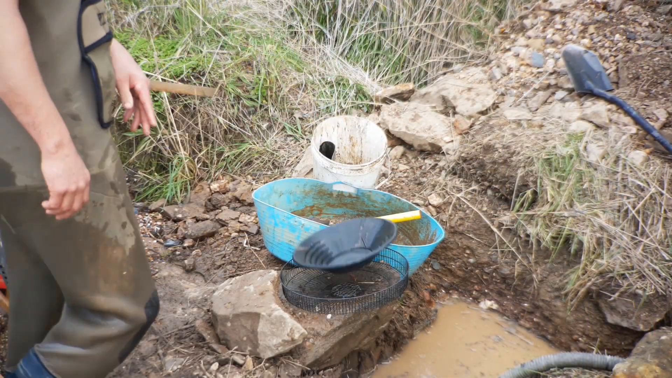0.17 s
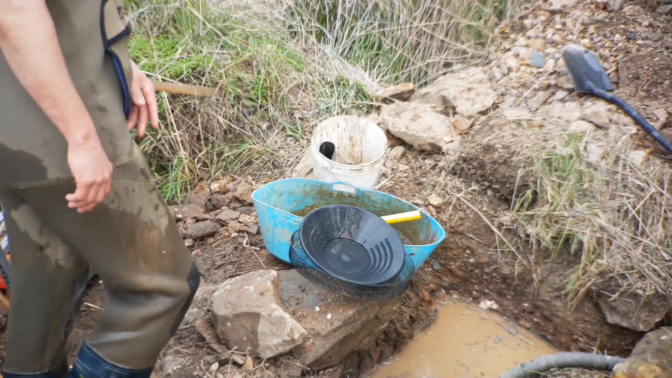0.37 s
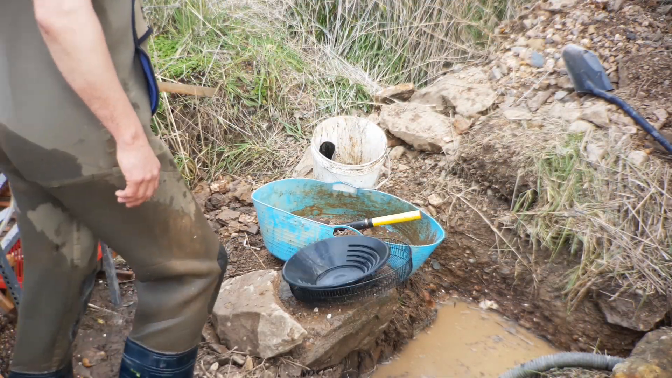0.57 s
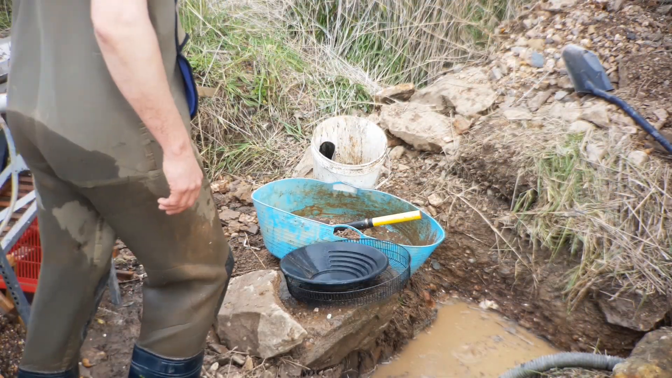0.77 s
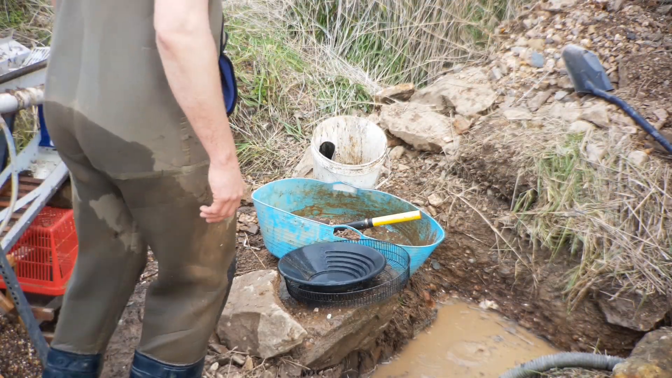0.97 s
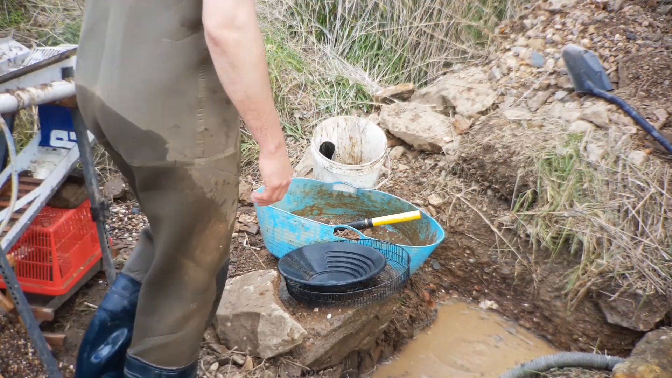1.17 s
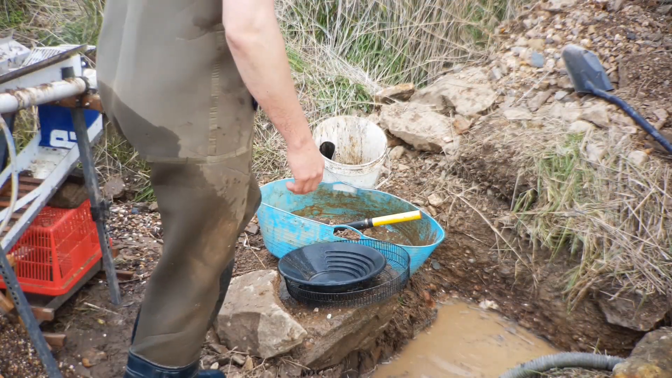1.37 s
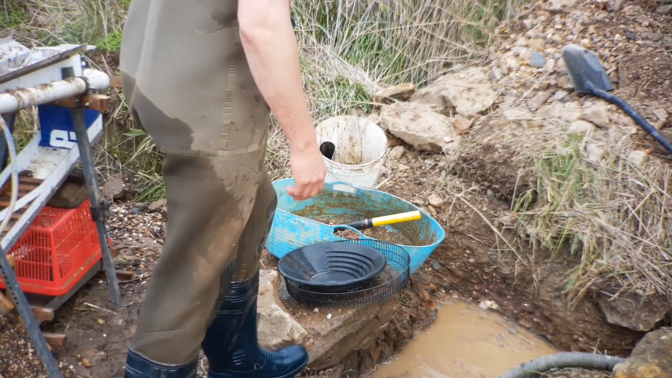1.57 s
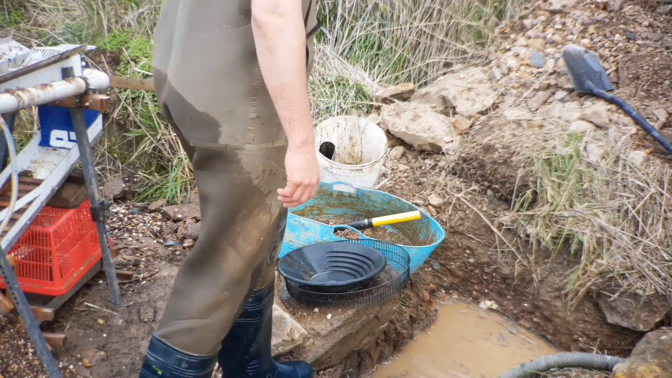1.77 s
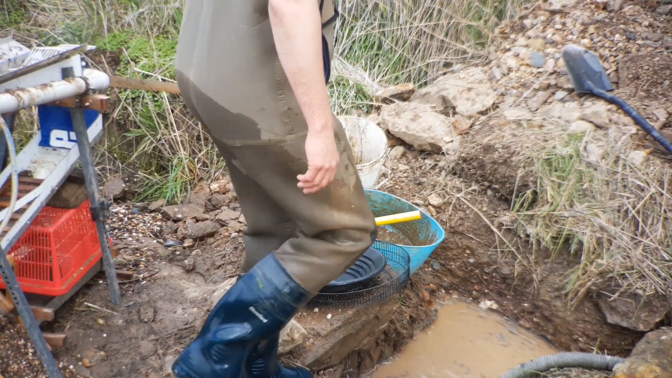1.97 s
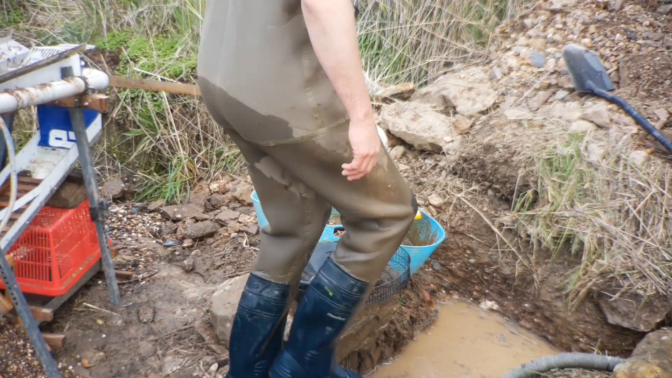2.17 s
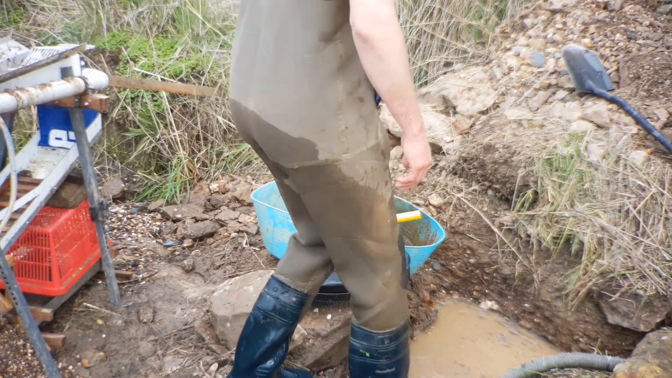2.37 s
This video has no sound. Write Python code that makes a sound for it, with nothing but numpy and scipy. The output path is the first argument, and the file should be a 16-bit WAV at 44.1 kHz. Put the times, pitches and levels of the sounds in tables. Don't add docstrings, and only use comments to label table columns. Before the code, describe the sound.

Tossed plastic pan lands with a hollow clatter on wire mesh, rattling quickly until it settles

```python
import sys
import numpy as np
from scipy import signal
from scipy.fft import rfft, irfft, next_fast_len
from scipy.io import wavfile
from scipy.ndimage import map_coordinates

SR = 44100
rng = np.random.default_rng(int(sys.argv[2]) if len(sys.argv) > 2 else 0)


def to_wav(sig):
    pcm = np.clip(np.atleast_2d(sig), -1, 1) * 32767
    pcm = np.round(pcm).astype(np.int16)
    wavfile.write(sys.argv[1], SR, pcm.T)


def amplitude_ratio(level_db):
    exponent = np.asarray(level_db, float) / 20
    return 10 ** exponent


N = 105840


def unit(x):
    return x / np.sqrt(np.mean(x ** 2) + 1e-20)


def along(points, hz):
    f, v = np.transpose(points)
    return np.interp(np.log(hz + 1), np.log(f + 1), v)


def filtered(x, response):
    m = next_fast_len(N + SR // 2)
    return irfft(rfft(x, m) * response(np.fft.rfftfreq(m, 1 / SR)), m)[..., :N]


def causal(x, points):
    cepstrum = irfft(np.log(amplitude_ratio(along(points, np.fft.rfftfreq(2048, 1 / SR)))))
    cepstrum[1:1024] *= 2
    cepstrum[1025:] = 0
    return signal.fftconvolve(x, irfft(np.exp(rfft(cepstrum))))[:N]


def add_at(x, start_s, sound):
    x[round(start_s * SR):][:len(sound)] += sound


def bursts(times_s, dbs, t60, tail_t60, tail_db):
    x, t = np.zeros(N + SR), np.arange(SR // 5) / SR
    shape = amplitude_ratio(-60 * t / t60) + amplitude_ratio(tail_db - 60 * t / tail_t60)
    for s, db in zip(times_s, dbs):
        add_at(x, s, amplitude_ratio(db) * shape * rng.standard_normal(len(t)))
    return x[:N]


def clicks(times_s, dbs):
    return np.bincount(np.round(times_s * SR).astype(int), amplitude_ratio(dbs), N)


def grains(rate_hz, spread_db):
    hit = rng.random(N) < rate_hz / SR
    return unit(hit * rng.standard_normal(N) * amplitude_ratio(spread_db * rng.exponential(size=N)))


def rubbing(rows, colour):
    t = np.arange(N) / SR
    swell = np.zeros(N)
    for start_s, length_s, db in rows:
        swell += amplitude_ratio(db) * np.sin(np.pi * np.clip((t - start_s) / length_s, 0, 1)) ** 2
    return swell * unit(causal(grains(3000, 2.7), colour))


# frequency in Hz, level in dB.
AIR_COLOUR = [(110, -0.5), (2500, -13), (4000, -23.5), (7000, -30), (11300, -32), (12200, -25.5),
              (15700, -25.5), (15900, -71.5)]
# frequency in Hz, correlation from -1 to 1.
AIR_LIKENESS = [(60, 0.85), (240, 0.55), (950, -0.15), (3770, -0.18), (15000, 0.0)]
AIR_DB = -66.5
HUM_HZ, HUM_WIDTH_HZ, HUM_DB, DEEP_DB = 64.3, 15, -67.5, -88
AIR_LEAN_DB = -1.5


def air():
    def mid_side(hz):
        turn = np.arccos(np.clip(along(AIR_LIKENESS, hz), -1, 1)) / 2
        low_cut = hz ** 2 / (hz ** 2 + 40 ** 2)
        return amplitude_ratio(along(AIR_COLOUR, hz)) * low_cut * np.array([np.cos(turn), np.sin(turn)])

    mid, side = filtered(rng.standard_normal((2, N)), mid_side)
    hiss = unit(np.array([mid + side, mid - side]))
    hum = unit(filtered(rng.standard_normal(N), lambda hz: np.exp(-((hz - HUM_HZ) / HUM_WIDTH_HZ) ** 2)))
    deep = unit(filtered(rng.standard_normal((2, N)), lambda hz: (hz > 15) * np.exp(-(hz / 90) ** 2)))
    both = amplitude_ratio(AIR_DB) * hiss + amplitude_ratio(HUM_DB) * hum + amplitude_ratio(DEEP_DB) * deep
    return both * amplitude_ratio([[AIR_LEAN_DB / 2], [-AIR_LEAN_DB / 2]])


# start in seconds, length in seconds, level in dB.
BRUSHES = [
    (.05, .05, -80),
    (1.725, .056, -77),
    (1.897, .0085, -75),
    (2.312, .012, -77),
    (2.369, .012, -77),
]
# frequency in Hz, level in dB.
BRUSH_COLOUR = [(2000, -36), (3800, -4), (5500, -13), (8000, 2), (8800, -16)]


def brushing():
    return rubbing(BRUSHES, BRUSH_COLOUR)


# start in seconds, peak in dB, first ring in Hz, second ring in Hz, # wire tick over
# the peak in dB.
CONTACTS = [(0.2287, -14, 744, 1157, -20.5), (.2349, -11, 632, 1130, -10.5), (.2395, -15.5, 574, 910, -38),
            (0.2444, -11, 1180, 1390, -37.5), (.2518, -11.5, 689, 1012, -14),
            (0.2558, -11.5, 1092, 1226, -28), (0.2628, -22.5, 544, 1070, -41),
            (.2995, -16.5, 790, 1593, -33.5), (.364, -33.5, 504, 1060, -35), (0.438, -30, 277, 560, -45),
            (0.4427, -20, 526, 910, -22.5), (.473, -14.5, 1055, 420, -32), (.479, -21, 540, 1211, -53),
            (0.5264, -19.5, 543, 1045, -23), (.547, -35, 493, 905, -40), (.5605, -28, 375, 418, -38),
            (0.589, -17.5, 840, 752, -19), (0.612, -22.5, 616, 896, -21.5), (0.63, -19.5, 815, 1090, -14.5),
            (.638, -23, 785, 1310, -12.5), (.646, -28, 603, 834, -31), (0.66, -35, 590, 1260, -33),
            (0.6759, -31.5, 605, 1180, -32), (.685, -26, 823, 587, -11.5), (.692, -25.5, 814, 830, -45),
            (0.73, -30, 810, 1120, -29), (0.7338, -39, 470, 1135, -16), (.739, -28.5, 358, 870, -19),
            (.763, -28, 626, 800, -22), (.767, -26, 364, 820, -30), (.779, -23.5, 938, 333, -12),
            (.787, -26.5, 875, 550, -19.5), (0.7954, -31.5, 436, 710, -28), (0.818, -36, 365, 1345, -31),
            (.843, -33.5, 553, 844, -38), (0.857, -31.5, 461, 845, -28), (.876, -26, 420, 692, -30.5),
            (.886, -34.5, 488, 746, -27)]
# frequency in Hz, level in dB, t60 in seconds.
PAN_MODES = [(231, -6, 0.038), (370, -7.5, 0.045), (558, -5, .045), (620, -7, .04), (800, -3.5, 0.019),
             (1016.4, -10, 0.015), (1243, -7, 0.013), (1491, -9, .018), (1660, -8, 0.015),
             (1880, -10, .015), (2240, -12.5, .025), (2730, -14.5, 0.016), (3070, -13.5, .02),
             (3870, -20, .015)]
FOCUS_OCT, FOCUS_DB = .65, 13
SCATTER_DB, DETUNE = 2.5, .02
BODY_DB, BODY_RISE_S, BODY_LONGER = -13, .0003, 1.25


def pan_body():
    mode_hz, mode_db, t60 = np.transpose(PAN_MODES)[:, :, None]
    x, t = np.zeros(N + SR), np.arange(SR // 4) / SR
    rise = 1 - np.exp(-t / BODY_RISE_S)
    for start_s, peak_db, _, second_hz, _ in CONTACTS:
        scatter, detune, phase = rng.standard_normal((3, len(PAN_MODES), 1))
        octaves = np.log2(mode_hz / second_hz)
        focus_db = FOCUS_DB * (np.exp(-(octaves / FOCUS_OCT) ** 2) - 1)
        decay_db = -60 * t / (BODY_LONGER * t60)
        level = amplitude_ratio(mode_db + focus_db + SCATTER_DB * scatter + decay_db)
        hz = mode_hz * (1 + DETUNE * detune)
        ring = (level * np.sin(2 * np.pi * hz * t + 2 * phase)).sum(axis=0) * rise
        add_at(x, start_s, amplitude_ratio(peak_db + BODY_DB) * ring / np.abs(ring).max() * 2)
    return x[:N]


# start in seconds, level in dB, pitch in Hz.
FLEXES = [(.2349, -32, 2600), (.247, -25.5, 1900), (.277, -32.5, 250), (.284, -33.5, 710),
          (.565, -34.5, 375), (.615, -32, 605), (.646, -32.5, 207), (.2445, -20.5, 1710), (.2445, -22, 870),
          (.2995, -23.5, 2740), (.31, -41.5, 800), (.312, -52, 2580), (.473, -17, 1880), (.473, -19, 1250),
          (.485, -25.5, 764), (.505, -37, 780), (.5265, -26.5, 1834), (.5887, -26, 1933),
          (.5887, -26, 3290), (.6113, -33, 2160), (.638, -28, 1780), (.6762, -32, 2800), (.6762, -33, 1920),
          (.72, -43, 290), (.779, -37, 3570), (.787, -33.5, 2470), (.7955, -36, 2620), (.80, -37, 370),
          (.822, -40, 375), (.85, -43, 590), (.901, -60, 700), (.923, -43.5, 453), (.924, -43, 720),
          (.936, -41, 813), (.947, -44, 844), (.956, -44, 405), (.968, -52.5, 830), (.975, -52, 298),
          (1.0, -58, 594), (1.038, -51, 550), (1.06, -54.5, 497)]
RIM_T60_S, RIM_SHORTER = 0.033, 0.46
RIM_DB, SECOND_RING_DB, RIM_RISE_S = -4.5, -1.5, .0008


def rim_rings():
    s, db, first_hz, second_hz, _ = np.transpose(CONTACTS)
    low = list(zip(s, db + RIM_DB, first_hz))
    high = list(zip(s, db + RIM_DB + SECOND_RING_DB, second_hz))
    x, t = np.zeros(N + SR), np.arange(SR // 4) / SR
    rise = 1 - np.exp(-t / RIM_RISE_S)
    for start_s, ring_db, hz in FLEXES + low + high:
        t60 = RIM_T60_S * (800 / hz) ** RIM_SHORTER
        add_at(x, start_s, -amplitude_ratio(ring_db - 60 * t / t60) * rise * np.sin(2 * np.pi * hz * t))
    return x[:N]


# start in seconds, level in dB.
EDGES = [(0.2284, -4), (0.235, -1), (0.2446, 4.5), (0.2516, -1.5), (.2995, 1.5), (0.4429, -0.5), (.473, -6),
         (0.5262, -10), (0.5889, 1), (0.6122, -12), (.6305, -13), (.6385, -13), (0.6763, -6.5),
         (0.7337, -11.5), (.739, -11), (.779, -9), (0.786, -18), (0.795, -9), (0.818, -17.5), (.843, -20),
         (0.859, -17.5), (.876, -13.5)]
# frequency in Hz, level in dB.
KNOCK_COLOUR = [(100, -39), (400, -4), (1500, 5), (3500, -6), (6000, -27), (16000, -42)]


def knock():
    s, db = np.transpose(CONTACTS)[:2]
    edge_s, edge_db = np.transpose(EDGES)
    crack = bursts(s, db - 13, t60=0.039, tail_t60=0.045, tail_db=-19.5)
    return causal(clicks(edge_s, edge_db) + crack, KNOCK_COLOUR)


# frequency in Hz, level in dB.
WIRE_COLOUR = [(1200, -41.5), (2500, -0.5), (4200, -13), (7800, -7.5), (10000, -16.5), (13000, -13.5),
               (15700, -20.5)]


def wire_tick():
    s, db, _, _, tick_db = np.transpose(CONTACTS)
    return causal(bursts(s, db + tick_db + 19, t60=0.0071, tail_t60=0.0079, tail_db=-17.5), WIRE_COLOUR)


# frequency in Hz, level in dB.
GRIT_COLOUR = [(1180, -31), (2000, -2.5), (4090, -15), (7520, -12.5), (9380, -14.5), (15000, -10),
               (15750, -13), (15950, -45)]
# frequency in Hz, level in dB.
GRAVEL_COLOUR = [(400, -25.5), (1200, -2.5), (2500, -1.5), (4000, -12.5), (8000, -22), (16000, -35)]
# frequency in Hz, width in Hz, level in dB.
ROLL_MODES = [(237, 30, -1.5), (375, 42, 1.5), (550, 24, -6.5), (677, 50, -2), (830, 180, -4),
              (1150, 250, -5.5), (1900, 400, -14.5), (2800, 600, -23.5)]
# time in seconds, rim rumble in dB, grit in dB, favoured pitch in Hz.
ROLL = [
    (0.2315, -29.5, -46.5, 800),
    (0.303, -48.5, -48.5, 800),
    (.425, -63, -62.5, 306),
    (.5, -48, -52, 500),
    (0.571, -43.5, -55.5, 348),
    (.62, -40.5, -62, 830),
    (.83, -51.5, -63.5, 370),
    (0.94, -53, -75, 645),
    (1.0, -60.5, -79.5, 500),
]
ROLL_FOCUS_OCT, ROLL_FOCUS_DB = 0.21, 8
GRAVEL_DB = -11
GRIT_FLUTTER_DB, GRIT_FLUTTER_HZ = 2, 44
GRIT_SIDE = .7


def rolling():
    s, rumble_db, grit_db, pitch_hz = np.transpose(ROLL)
    t = np.arange(N) / SR

    def level(db):
        fade_db = 150 * np.clip(t - s[-1], 0, None)
        return amplitude_ratio(np.interp(t, s, db, left=-140) - fade_db)

    def resonances(f):
        return amplitude_ratio(mode_db) * 1j * f * width / (hz * hz - f * f + 1j * f * width)

    hz, width, mode_db = np.transpose(ROLL_MODES)[:, :, None]
    modes = filtered(grains(1500, 2.5), resonances)
    near = np.exp(-(np.log2(hz / np.interp(t, s, pitch_hz)) / ROLL_FOCUS_OCT) ** 2)
    signs = (-1.) ** np.arange(len(hz))[:, None]
    rumble = unit((signs * modes * amplitude_ratio(ROLL_FOCUS_DB * near)).sum(axis=0))
    gravel = np.array([unit(causal(grains(2500, 1.5), GRAVEL_COLOUR)) for _ in range(2)])

    mid, side = [unit(causal(grains(15000, 3), GRIT_COLOUR)) for _ in range(2)]
    grit = np.array([mid + GRIT_SIDE * side, mid - GRIT_SIDE * side])
    flutter = amplitude_ratio(GRIT_FLUTTER_DB * map_coordinates(rng.standard_normal(200), [t * GRIT_FLUTTER_HZ]))
    return level(rumble_db) * (rumble + amplitude_ratio(GRAVEL_DB) * gravel) + flutter * level(grit_db) * grit


# start in seconds, level in dB, pitch in Hz.
THUDS = [(0.236, -36, 130), (0.249, -30.5, 107.7), (0.301, -38.5, 242.5), (0.362, -46.5, 138.1),
         (0.474, -31.5, 203.2), (0.526, -37, 209), (.64, -45, 158.6), (.779, -46.5, 130),
         (0.846, -50, 140.5), (0.942, -55, 134.6), (1.04, -60, 101.7)]
THUD_T60_S = 0.18


def sieve_thuds():
    x, t = np.zeros(N + SR), np.arange(SR // 4) / SR
    for start_s, db, hz in THUDS:
        add_at(x, start_s, amplitude_ratio(db - 60 * t / THUD_T60_S) * np.sin(2 * np.pi * hz * t))
    return x[:N]


# start in seconds, peak in dB.
SNAPS = [(0.967, -61), (1.068, -63.5), (1.802, -63), (1.853, -53), (1.876, -60.5), (1.896, -51),
         (1.96, -68.5), (2.036, -67), (2.318, -65.5), (2.374, -70)]
# frequency in Hz, level in dB.
SNAP_COLOUR = [(300, -14), (2000, 5), (4000, -4.5), (8000, -14), (9500, -23)]


def grit_snaps():
    s, db = np.transpose(SNAPS)
    burst = bursts(s, db + 5.5, t60=.006, tail_t60=.04, tail_db=-28)
    return causal(clicks(s, db + 14) + burst, SNAP_COLOUR)


# start in seconds, length in seconds, level in dB.
SCUFFS = [
    (1.71, .09, -69),
    (1.817, .12, -69),
    (1.825, .28, -69),
]
# frequency in Hz, level in dB.
SCUFF_COLOUR = [(200, 1.5), (900, -1), (2800, -4.5), (3800, -9), (4500, -18), (7500, -18.5), (9000, -28.5)]


def boot_scuffs():
    return rubbing(SCUFFS, SCUFF_COLOUR)


# frequency in Hz, t60 in seconds.
GROUND_T60 = [(200, 0.13), (2000, 0.085), (12000, 0.15)]
# frequency in Hz, level in dB.
GROUND_COLOUR = [(200, -16.5), (1000, -8.5), (5000, -5), (14000, -5.5)]


def ground(x):
    hz, t, z = signal.stft(rng.standard_normal((2, SR // 4)), SR, nperseg=128)
    decay = amplitude_ratio(-60 * t / along(GROUND_T60, hz)[:, None])
    tail = signal.istft(z * decay, SR, nperseg=128)[1]
    wet = signal.fftconvolve(causal(x, GROUND_COLOUR)[None], tail / np.linalg.norm(tail[0]), axes=1)
    return wet[:, :N]


# frequency in Hz, left over right in dB.
LEAN = [(100, -1), (500, -3), (1500, -2), (3000, -3.5), (5500, -10), (9000, -2.5), (14000, 4)]
# frequency in Hz, level in dB.
MIC = [(20, -20), (90, 0), (15700, 0), (16000, -16), (16600, -20), (16850, -60)]
LEFT_LAG_S = .000015


def scene():
    def placed(hz):
        lean = amplitude_ratio(np.array([[.5], [-.5]]) * along(LEAN, hz))
        return lean * np.exp(-1j * np.pi * hz * LEFT_LAG_S * np.array([[1], [-1]]))

    pan = pan_body() + rim_rings() + knock() + wire_tick() + sieve_thuds()
    near = brushing() + pan + grit_snaps() + boot_scuffs()
    direct = filtered(near + rolling() + ground(near), placed)
    return filtered(direct, lambda hz: amplitude_ratio(along(MIC, hz))) + air()


def band_limit(x):
    return signal.sosfilt(signal.butter(12, 16820, fs=SR, output="sos"), x)


def record(dry):
    return band_limit(dry - .0003)


dry = scene()
out = record(dry)
to_wav(out)
```